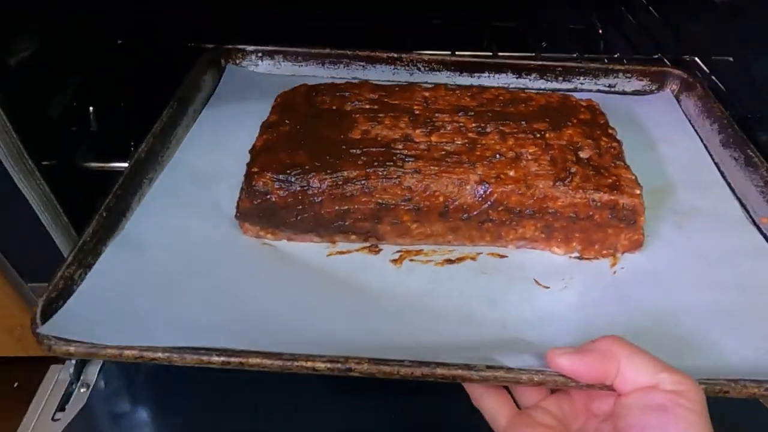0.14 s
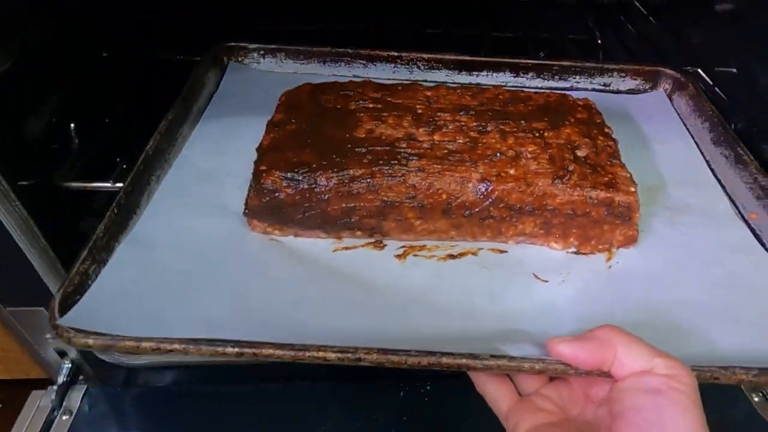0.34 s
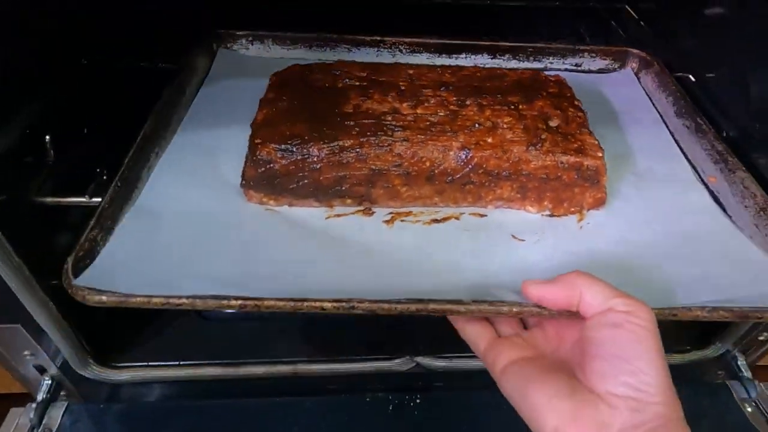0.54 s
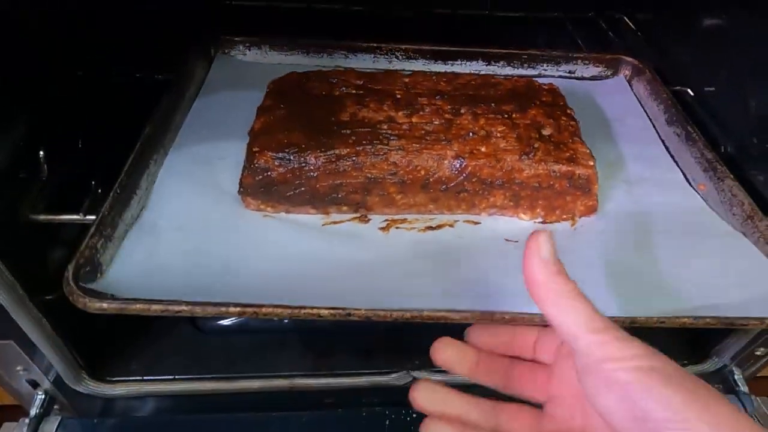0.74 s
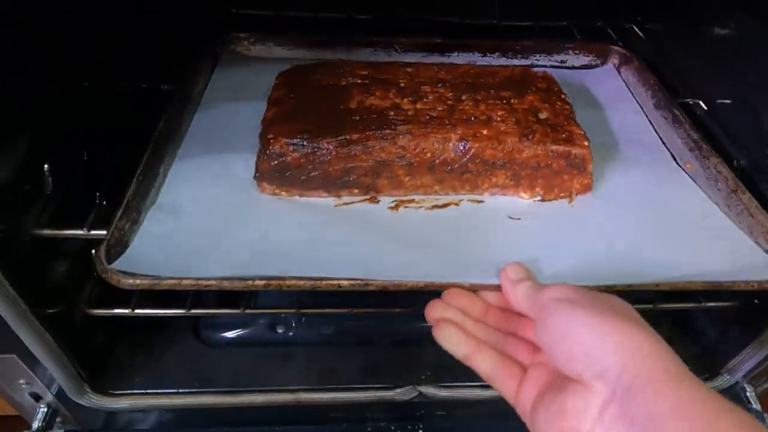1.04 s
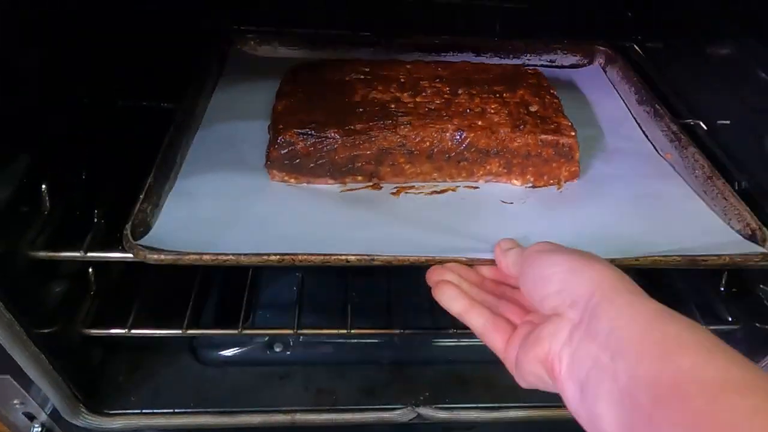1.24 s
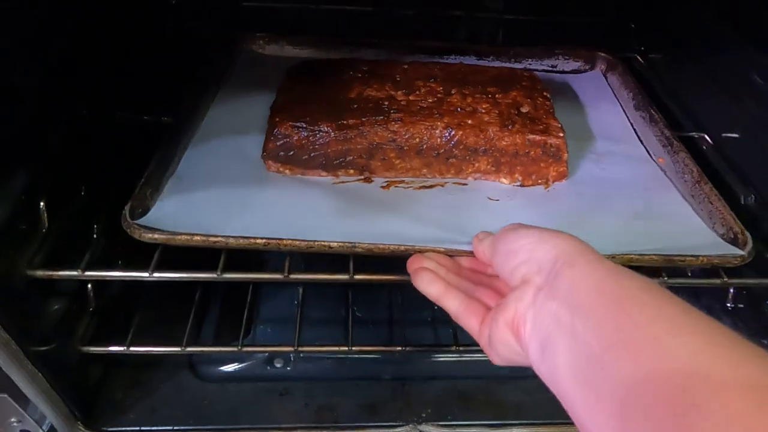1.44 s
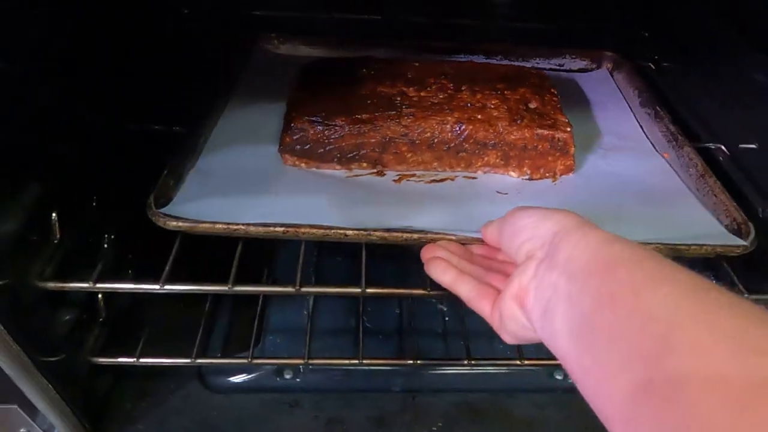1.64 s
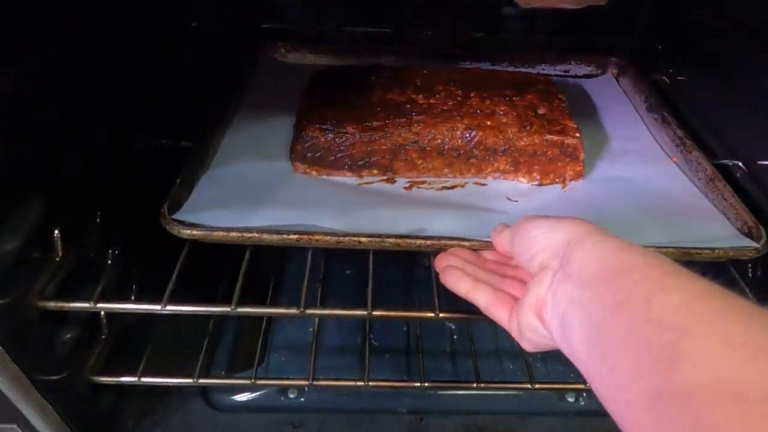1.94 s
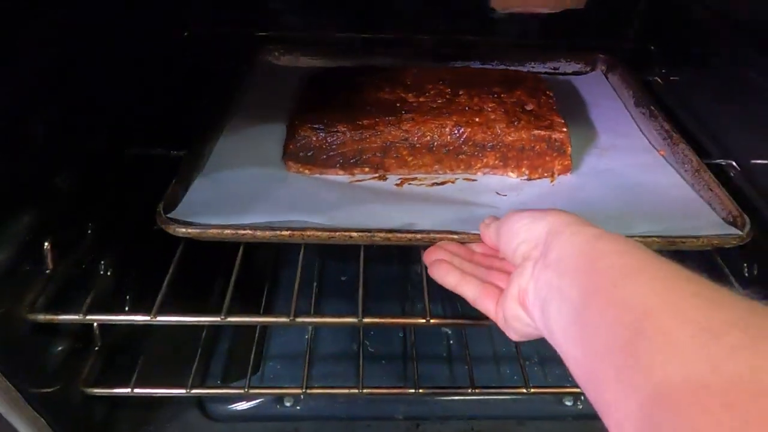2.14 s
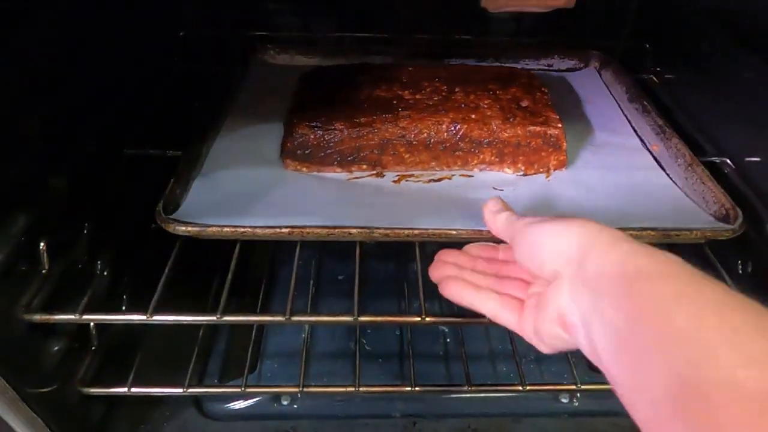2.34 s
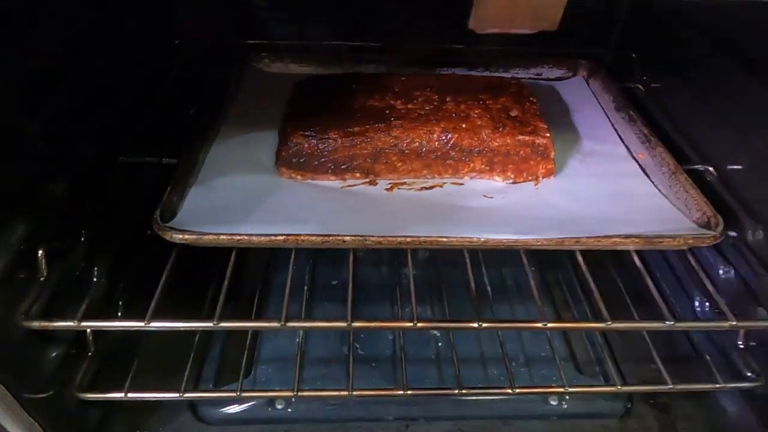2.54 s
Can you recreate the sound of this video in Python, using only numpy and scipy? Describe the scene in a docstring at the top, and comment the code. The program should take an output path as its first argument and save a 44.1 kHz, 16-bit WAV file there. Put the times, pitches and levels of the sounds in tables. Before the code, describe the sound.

A metal baking tray touches a wire oven rack, then scrapes inward in uneven shoves, rasping and booming with short squeaky catches, fading to light rubs; close stereo phone pickup, quiet kitchen hum.

```python
"""A baking tray slides into an oven on a wire rack, in three shoves: dense grit clicks between tray and
wires excite the sheet's modes, heard as a low boom, a middle rumble and a bright rasp.
The rim catches on wires in short pitched bursts, and the first touches ring the front wire.
The steel oven answers with short noise-like echoes that change as the tray moves in.
Coloured noise makes a quiet, gently swelling kitchen hum; a phone picks up the scene in stereo."""
import sys
import numpy as np
from scipy import signal
from scipy.fft import rfft, irfft
from scipy.io import wavfile
from scipy.ndimage import uniform_filter1d

SR = 44100
rng = np.random.default_rng(int(sys.argv[2]) if len(sys.argv) > 2 else 0)


def put_to_file(sound):
    """Save the sound as 16-bit audio at rate SR, in the file named by the first command-line argument."""
    columns = np.atleast_2d(sound).T  # one column per channel
    safe = np.clip(columns, -1, 1)
    whole_steps = np.round(safe * 32767)
    wavfile.write(sys.argv[1], SR, whole_steps.astype(np.int16))


N = 119070
PLACES = 60  # positions the tray passes through

# spectrum of the bright rasp: [f/Hz, relative level/dB per Hz]
RASP_SPECTRUM = [(410, -74.5), (800, -11.5), (1420, 8), (2080, 10), (4850, 12.5), (11900, -18),
                 (15000, -33)]


def undb(db):
    """Level to amplitude: 20 dB is a factor of ten."""
    return 10 ** (np.asarray(db) / 20)


def unit(x):
    """Normalisation to an RMS of 1."""
    return x / np.sqrt(np.mean(x ** 2))


def read(table, hz):
    """Interpolation of a [f/Hz, value] table, linear in log frequency."""
    table = np.array(table, float)
    return np.interp(np.log(np.maximum(hz, 1)), np.log(table[:, 0]), table[:, 1])


def colour(x, table, size=4096):
    """Minimum-phase filtering: the folded cepstrum makes a [f/Hz, level/dB] gain causal, with unit energy."""
    log_gain = read(table, np.arange(size // 2 + 1) * SR / size) * np.log(10) / 20
    cepstrum = irfft(log_gain)
    cepstrum[1:size // 2] *= 2
    cepstrum[size // 2 + 1:] = 0
    response = irfft(np.exp(rfft(cepstrum)))
    return signal.fftconvolve(x, unit(response) / np.sqrt(size))[:len(x)]


def walk(rate_hz):
    """Slow random modulation: held random levels, smoothed twice, with an RMS of 1."""
    hold = int(SR / rate_hz)
    steps = np.repeat(rng.standard_normal(N // 100), hold)[:N]
    return unit(uniform_filter1d(uniform_filter1d(steps, hold), hold))


def moving(x, responses):
    """Time-varying convolution: each place has its own response, with equal-power cross-fades between."""
    out = np.zeros(N + SR)
    place = np.arange(N) * (PLACES - 1) / N
    for k, response in enumerate(responses):
        start = max(int((k - 1) * N / (PLACES - 1)), 0)
        end = min(int((k + 1) * N / (PLACES - 1)), N)
        fade = np.cos(np.pi / 2 * (place[start:end] - k))
        y = signal.fftconvolve(x[start:end] * fade, response)
        out[start:start + len(y)] += y
    return out[:N]


def ring(x, modes, scatter_db=0):
    """Modal superposition: damped sines whose strengths may scatter from place to place of contact."""
    t = np.arange(SR // 3) / SR
    responses = []
    for hz, db, t60 in modes:
        t60 = max(t60, .01)
        decay = undb(db - 60 * t / t60) / np.sqrt(t60)  # the root makes energy independent of t60
        responses.append(decay * np.sin(2 * np.pi * hz * t))
    strengths = undb(scatter_db * rng.standard_normal((PLACES, len(modes))))
    at_places = strengths @ np.array(responses)
    mean_energy = np.mean(np.sum(at_places ** 2, 1))
    return moving(x, at_places / np.sqrt(mean_energy))  # keeps the power of a noisy input


def kitchen():
    """Diffuse background: independent mid and side noise of one spectrum, swelling together."""
    # hum spectrum: [f/Hz, relative level/dB per Hz]
    hum_spectrum = [(35, -82.5), (60, -41), (230, -1), (431, -19), (850, -26), (1340, -20), (2300, -24),
                    (3500, -33), (4900, -26), (9000, -39.5), (11700, -70.5)]
    mid = colour(rng.standard_normal(N), hum_spectrum)
    side = .48 * colour(rng.standard_normal(N), hum_spectrum)
    swell_db, swell_hz = 2, 12  # RMS depth, rate of new random levels
    level = undb(-60.5 + swell_db * walk(swell_hz))
    return level * np.array([mid + side, mid - side])


def echo(x, db, t60_table):
    """Statistical reverberation: decaying octave noise, shared and left-right, new at each place."""
    # left-right echo relative to the shared one: [f/Hz, level/dB]
    side_level = [(100, -29.5), (300, -6.5), (1000, -6.5), (3000, -7.5), (12000, 0)]
    t = np.arange(SR // 4) / SR
    tails = np.zeros((2, PLACES, len(t)))
    for hz in 110 * 2. ** np.arange(8):
        band = [hz / np.sqrt(2), hz * np.sqrt(2)]
        sos = signal.butter(2, band, "bandpass", fs=SR, output="sos")
        t60 = max(read(t60_table, hz), 4 / hz)  # at least four cycles
        kept = t[:int(SR * t60)]
        tail = signal.sosfilt(sos, rng.standard_normal((2, PLACES, len(kept))))
        tail *= undb(-60 * kept / t60)
        # energy in proportion to bandwidth
        tail *= np.sqrt(hz / SR / np.mean(np.sum(tail ** 2, 2)))
        tail[1] *= undb(read(side_level, hz))
        tails[..., :len(kept)] += tail
    mid, side = (undb(db) * 2 * moving(x, responses) for responses in tails)
    return np.array([mid + side, mid - side])


def grit():
    """Stochastic friction: dense random clicks of uneven size, in uneven patches, with an RMS of 1."""
    clicks_per_s, size_db, biggest_db = 5000, 2.6, 11  # size: mean and cap, over the smallest grain
    flicker_db, flicker_hz = 1.3, 30  # RMS depth, rate of new random levels
    on = rng.random(N) < clicks_per_s / SR
    size = undb(np.minimum(size_db * rng.exponential(size=N), biggest_db))
    sign = np.sign(rng.standard_normal(N))
    return unit(on * size * sign * undb(flicker_db * walk(flicker_hz)))


def sheet(x, spectrum):
    """Plate radiation: a broad spectrum with discrete modes, scattered from place to place, on top."""
    # higher modes of sheet and wires: [f/Hz, relative level/dB, t60/s]
    plate_modes = [(542, -3, .1), (650, -3, .07), (790, -4, .07), (951, -3, .07), (1215, -2, .07),
                   (1460, 0, .05), (1735, -3, .04), (2750, -3, .03), (3370, -5, .03), (3712, -4, .03),
                   (4185, -4, .03), (4680, -4, .03)]
    broad = colour(x, spectrum)
    return broad + undb(-17) * ring(broad, plate_modes, scatter_db=3)


def touches():
    """Impulsive friction: the tray edge bounces on the front wire and its short rubs ring the wire."""
    # first contacts: [t/s, level/dB]
    contacts = [(0.188, -47), (0.199, -33), (0.21, -27), (0.214, -19), (0.219, -20), (.2255, -19)]
    # front wire's modes: [f/Hz, relative level/dB, t60/s (raised to 0.01 in ring)]
    wire_modes = [(3000, -7, .004), (4190, -1, .012), (4690, 0, .008), (7780, -14, .006)]
    # spectrum of the rubs: [f/Hz, relative level/dB]
    rub_spectrum = [(1800, -20), (2600, 0), (8300, -2), (9500, -25)]
    fade_s = .005  # time constant of each rub
    t = np.arange(N) / SR
    push = np.zeros(N)
    for start, db in contacts:
        push += undb(db) * (t > start) * np.exp(-np.maximum(t - start, 0) / fade_s)
    return ring(colour(push * grit(), rub_spectrum), wire_modes)


def catches():
    """Resonant friction bursts: grit swells to a tick, decays and leans to its own pitch in the sheet."""
    # rim catches, levels ahead of the sheet: [tick t/s, level/dB, pitch f/Hz,
    # pitched part level/dB (ahead of a doubling), rise time constant/s, t60/s]
    rim_catches = [(0.2184, -14.5, 1570, 4, 0.0035, 0.42), (0.275, -16.5, 2640, -2, 0.0051, 0.031),
                   (0.294, -16, 4620, -10, 0.00067, 0.16), (0.349, -16.5, 3780, -12, 0.00088, 0.13),
                   (0.418, -12, 4800, -18, 0.0013, 0.078), (0.464, -13, 1730, 6, 0.0022, 0.14),
                   (0.6603, -21.5, 2880, 8, 0.0063, 0.095), (0.688, -17, 5500, -8, 0.0038, 0.1),
                   (0.7002, -21.5, 3300, -19, 0.003, 0.069), (0.744, -23.5, 2580, -11, 0.0031, 0.21),
                   (0.7753, -11, 2680, -27, 0.011, 0.072), (0.7995, -22, 2900, 11, 0.0013, 0.04),
                   (0.8386, -25.5, 1450, -3, 0.0015, 0.13), (0.9319, -18, 2800, -29, 0.00057, 0.02),
                   (0.9743, -13, 1990, -5, 0.0044, 0.094), (1.058, -20, 2630, -13.5, 0.0012, 0.48),
                   (1.0753, -22.5, 2560, 3, 0.0023, 0.26), (1.123, -13.5, 1480, 15, 0.0015, 0.041),
                   (1.2057, -1.5, 1630, 12, 0.0013, 0.033), (1.343, -16, 1640, 8, 0.002, 0.05),
                   (1.473, -24.5, 3760, -8.5, 0.0041, 0.38), (1.5023, -25.5, 3720, 4.5, 0.017, 0.49),
                   (1.8998, -25.5, 2900, -1.5, 0.008, 0.043), (1.9129, -20, 4000, -12, 0.0015, 0.087),
                   (1.942, -25, 2670, -4, 0.0039, 0.36), (2.3478, -31, 3330, 7.5, 0.00084, 0.052),
                   (2.3722, -10.5, 4950, -20.5, 0.0052, 0.094), (2.403, -22, 2700, 13, 0.004, 0.054),
                   (2.426, -26, 2330, 13.5, 0.0083, 0.041)]
    tick_db = 6  # ahead of a doubling
    pitch_width = .16  # bandwidth over centre frequency
    lead_in = SR // 20
    t = np.arange(-lead_in, SR // 4) / SR
    out, stream = np.zeros(N), grit()
    for tick_s, db, hz, pitch_db, rise, t60 in rim_catches:
        start = int(tick_s * SR) - lead_in
        swell = np.exp(np.minimum(t, 0) / rise)
        decay = undb(-60 * np.maximum(t, 0) / t60)
        burst = swell * decay * stream[start:start + len(t)]
        burst[lead_in] += undb(tick_db) * 2
        b, a = signal.iirpeak(hz, 1 / pitch_width, fs=SR)
        pitched = undb(pitch_db) * 2 * signal.lfilter(b, a, burst)
        burst = (burst + pitched) / np.hypot(1, undb(pitch_db))
        out[start:start + len(t)] += undb(db) * burst
    return sheet(out, RASP_SPECTRUM)


def slide():
    """Source-filter friction: one stream of grit under the moving tray drives boom, rumble and rasp."""
    # drive levels: [t/s, lower boom level/dB, upper boom level/dB, rumble level/dB, rasp level/dB]
    drive = np.array([(0.208, -76, -85, -102, -63), (0.227, -21.5, -26.5, -20, -20.5),
                      (0.3, -29, -30.5, -21, -22), (0.38, -36, -25.5, -21, -24),
                      (0.49, -46, -18, -18.5, -28.5), (0.65, -28.5, -24.5, -28, -25.5),
                      (0.74, -29.5, -35.5, -32, -27), (0.8, -48, -37.5, -42, -38),
                      (0.985, -54, -39, -37.5, -41.5), (1.008, -27, -28.5, -35, -35),
                      (1.1, -41, -27.5, -27.5, -26.5), (1.21, -41.5, -20.5, -26.5, -25),
                      (1.24, -21.5, -28, -20, -27), (1.331, -45, -24, -31, -31),
                      (1.45, -34, -27.5, -25, -31.5), (1.57, -32, -25.5, -25, -28.5),
                      (1.729, -34.5, -29, -31.5, -27.5), (1.89, -45, -39, -39, -39.5),
                      (2.01, -35, -33, -31.5, -36), (2.29, -37.5, -33, -41, -35),
                      (2.37, -35.5, -38, -33, -26), (2.44, -64, -43.5, -39, -56),
                      (2.47, -71, -40.5, -72, -64)])
    # low modes of the sheet: [f/Hz, relative level/dB, t60/s]
    boom_modes = [(140, -15, .1), (199, 0, .24), (232, -11, .12), (366, 0, .17), (395, -3, .12),
                  (422, -8, .14)]
    # noise part of the boom: [f/Hz, relative level/dB per Hz]
    boom_spectrum = [(24, -66), (40, -41), (189, -5.5), (295, -8.5), (388, 1.5), (469, -19), (500, -3.5),
                     (650, -52.5), (1100, -120)]
    # middle rumble: [f/Hz, relative level/dB]
    rumble_spectrum = [(300, -44.5), (480, -23.5), (620, -3.5), (1000, 0), (1500, -0.5), (2500, -8.5),
                       (5000, -64.5)]
    split_hz = 300  # between the lower and upper family of boom modes
    t = np.arange(N) / SR
    clicks = grit()
    deep, low, mid, high = (
        clicks * undb(np.interp(t, drive[:, 0], level, -99, -99)) for level in drive[:, 1:].T)
    boom = ring(deep, [mode for mode in boom_modes if mode[0] < split_hz])
    boom += ring(low, [mode for mode in boom_modes if mode[0] > split_hz])
    boom += undb(-8) * colour(deep + low, boom_spectrum)
    return boom, sheet(mid, rumble_spectrum) + sheet(high, RASP_SPECTRUM)


def lead_left(left):
    """Interchannel phase: each frequency at the left port is advanced or delayed."""
    # phase by which the left port leads (negative: lags): [f/Hz, phase/rad]
    port_lead = np.array([(100, 0), (2600, -.7), (6000, -.3), (10000, 0)])
    hz = np.arange(N // 2 + 1) * SR / N
    phase = np.interp(hz, port_lead[:, 0], port_lead[:, 1])
    return irfft(rfft(left) * np.exp(1j * phase), N)


def scene():
    """Superposition of direct sound, a short smear of it, oven reverberation and kitchen hum."""
    # decay of the oven: [f/Hz, t60/s]
    oven_t60 = [(100, 0.2), (700, 0.13), (1300, .36), (4000, 0.3), (12000, 0.2)]
    boom, scrape = slide()
    scrape = scrape + catches() + touches()
    sent = scrape + undb(-8) * boom  # the boom is sent to the oven echo at a lower level
    early = echo(sent, -13, [(1000, .042)])  # a short noise smear that blurs the direct sound; t60 42 ms
    oven = echo(sent, -13.5, oven_t60)
    left, right = boom + scrape + early + oven
    return np.array([lead_left(left), right]) + kitchen()


def record(dry):
    """Band limiting and overload: the phone cuts the bass, clips at full scale and cuts the top."""
    bass_cut_hz, top_hz = 147, 15300
    highpass = signal.butter(4, bass_cut_hz, "highpass", fs=SR, output="sos")
    lowpass = signal.ellip(8, .2, 70, top_hz, fs=SR, output="sos")  # 0.2 dB ripple, 70 dB stopband
    clipped = np.clip(signal.sosfilt(highpass, dry), -1, 1)
    return signal.sosfilt(lowpass, clipped)


dry = scene()
out = record(dry)
put_to_file(out)
```